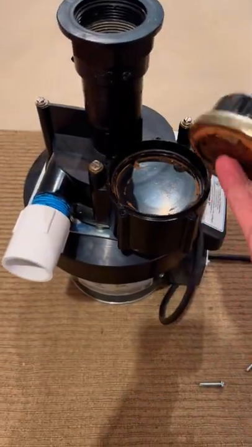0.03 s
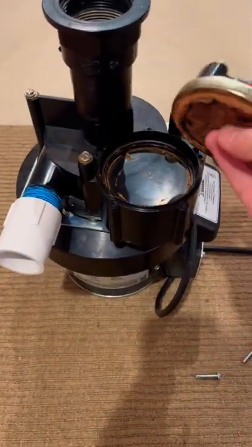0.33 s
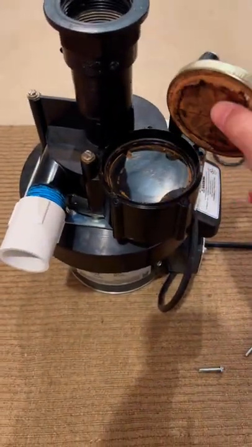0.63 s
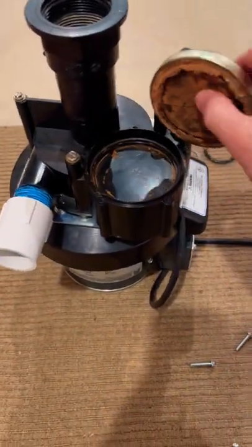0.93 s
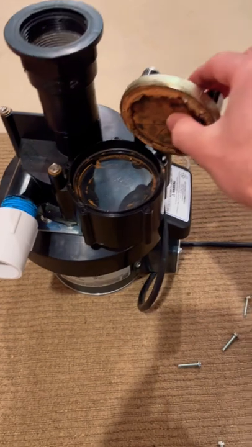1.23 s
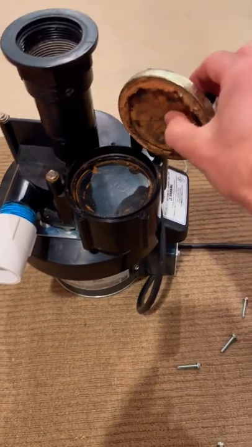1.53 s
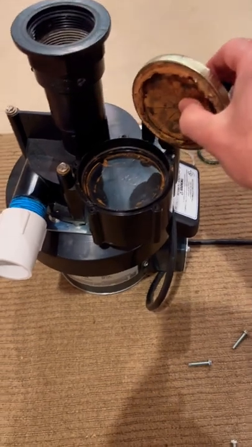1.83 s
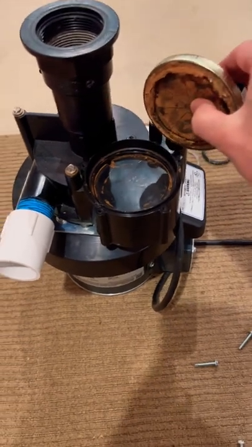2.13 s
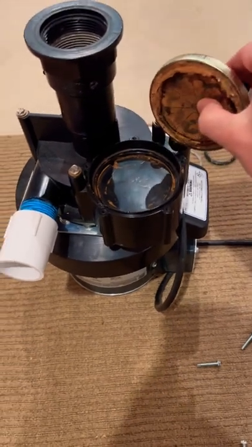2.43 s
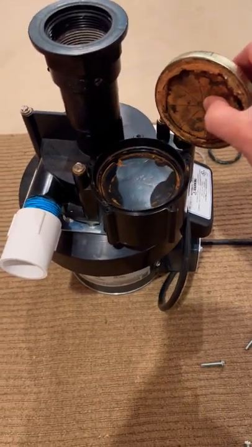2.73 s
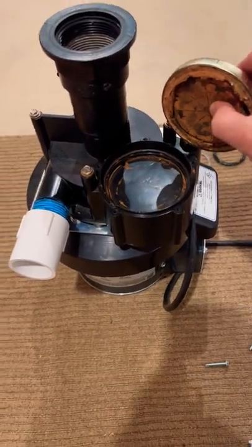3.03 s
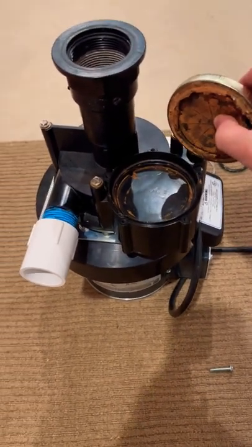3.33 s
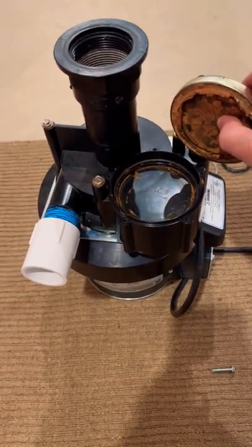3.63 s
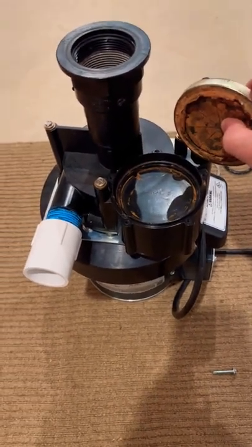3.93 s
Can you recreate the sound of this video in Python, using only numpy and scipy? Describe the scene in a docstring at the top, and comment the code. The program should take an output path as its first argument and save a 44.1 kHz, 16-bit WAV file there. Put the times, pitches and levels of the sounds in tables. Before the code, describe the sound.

In a quiet room, fingers brush softly on a metal cap. Then a switch snaps and a nearby electric pump motor buzzes briefly, settling into an even hum with a faint whine and fine rattle.

```python
"""An induction pump motor runs dry on a table in a quiet room, close to a phone, a hand on its metal cap.
After a few faint touches the switch snaps; the windings buzz with starting current and the rotor spins up.
Mains and rotor-slot tones then beat against each other over the rub of the shaft seal, which comes round
every turn with the ticks of loose parts. Room rumble and hiss lie underneath; all is heard in stereo."""
import sys
import numpy as np
from scipy import signal
from scipy.fft import rfft, irfft
from scipy.io import wavfile
from scipy.ndimage import uniform_filter1d

SR = 44100
rng = np.random.default_rng(int(sys.argv[2]) if len(sys.argv) > 2 else 0)


def master(y):
    """Save y as 16-bit WAV."""
    cut = np.clip(np.atleast_2d(y).T, -1, 1)
    pcm = np.round(cut * 32767)  # scale
    wavfile.write(sys.argv[1], SR, pcm.astype(np.int16))


N = 176400

MAINS_HZ, SHAFT_HZ = 59.973, 29.5405
ON_S, CURRENT_RISE_S, SPIN_UP_S = 1.506, .015, .188
CREST_S = 2.318  # neighbouring motor tones crest together here
FIELD_RISE_POWER, TONE_RISE_POWER = 12, 1.3  # loudness grows as these powers of speed


def motor(t):
    """Current flows at once; the rotor gathers speed and settles just under half the mains rate."""
    current = np.clip((t - ON_S) / CURRENT_RISE_S, 0, 1)
    speed = np.clip((t - ON_S) / SPIN_UP_S, 0, 1) ** .97  # share of full speed
    turns = np.cumsum(SHAFT_HZ * speed * (1 + .0001 * walk(5))) / SR
    turns -= np.interp(CREST_S, t, turns)  # shaft angle counts from the crest
    wave_phases = rng.random(64)
    tones = stator_hum(t, turns, speed, wave_phases) + rotor_tones(t, turns, speed, wave_phases)
    tones += bearing_whine(turns, speed) + starting_buzz(t, speed)
    whine = slot_flutter(t, turns, speed)
    return current * tones + whine + seal_rub(t, turns, speed, current) + rattle(turns, speed)


def motor_partial(t, turns, wave_phases, mains, shaft, db, pan_db):
    """A mains multiple plus a shaft multiple; neighbours share a magnetic wave and throb with slip."""
    hz = mains * MAINS_HZ + shaft * SHAFT_HZ
    phase = wave_phases[round(hz / (2 * MAINS_HZ))]
    return tone(mains * MAINS_HZ * (t - CREST_S) + shaft * turns + phase, hz, db, pan_db)


def stator_hum(t, turns, speed, wave_phases):
    """The stator's magnetic hum blooms as the rotor nears full speed."""
    # hum partials: mains_multiple, shaft_sideband, level_db, pan_db
    partials = [(6, 0, -62.8, -1), (10, 0, -63.2, -3), (12, -2, -67.4, -4), (12, -1, -55.8, -1),
                (12, 0, -49.1, 2), (12, 1, -65.2, 1), (14, -1, -68.3, 5), (14, 0, -61.3, -1),
                (14, 1, -69.5, -4), (16, -1, -74, -3), (16, 0, -65.5, -5), (16, 1, -67, -8),
                (18, -1, -56.2, -9), (18, 0, -47.7, -10), (18, 1, -54.9, -17), (20, 0, -64.6, -11),
                (22, 0, -66.9, -2), (22, 1, -74.0, -2), (26, 0, -70.0, -4), (36, 0, -78, 1),
                (36, 1, -78, -4)]
    hum = sum(motor_partial(t, turns, wave_phases, *row) for row in partials)
    return speed ** FIELD_RISE_POWER * hum


def rotor_tones(t, turns, speed, wave_phases):
    """Tones of the rotor, its vanes and slots glide up, swelling through the housing's resonances."""
    # rotor partials: shaft_multiple, mains_sideband, relative_db, pan_db
    partials = [(10, 0, -64.2, 2), (12, 0, -46.8, 1), (16, 0, -58.5, -5), (20, 0, -63.6, -4),
                (24, 0, -68.4, 1), (28, 0, -61.5, 0), (38, -2, -66.6, -10), (39, -2, -66.9, -8),
                (39, 0, -68.9, -15), (40, -4, -67, -6), (40, -2, -43.1, -16), (40, 2, -72.9, 1),
                (40, 4, -73.4, 0), (40, 6, -76, -4), (40, 12, -71, -3), (41, -4, -70.0, -7),
                (41, 0, -69.7, -6), (41, 2, -76.3, -6), (41, 8, -72, -2), (41, 10, -69.5, -3),
                (80, 0, -81.8, -3), (120, 0, -82, -2), (120, 4, -74, 3), (120, 6, -77.5, -5),
                (121, 4, -81.2, 6), (160, -2, -82, -15), (160, 2, -76.8, -3), (160, 4, -84.5, -9)]
    # housing resonances: frequency_hz, gain_db
    housing = [(200, -15), (320, -21), (354, -3), (390, 4.5), (470, -13), (530, -9), (600, -2), (650, 3),
               (720, 10), (810, -5), (980, -17), (1060, 2), (1200, -19), (3200, -47), (3700, -17)]
    out = 0
    for shaft, mains, db, pan_db in partials:
        gliding_hz = np.abs(mains * MAINS_HZ + shaft * SHAFT_HZ * speed)
        settled_hz = mains * MAINS_HZ + shaft * SHAFT_HZ
        swell_db = at(housing, gliding_hz) - at(housing, settled_hz)
        out += motor_partial(t, turns, wave_phases, mains, shaft, db + swell_db, pan_db)
    return undb(.5) * speed ** TONE_RISE_POWER * out


def starting_buzz(t, speed):
    """Starting current buzzes in the windings and is gone at full speed."""
    # buzz harmonics: mains_multiple, relative_db
    harmonics = [(8, -72), (9, -46.5), (10, -53), (11, -56), (12, -43.5), (13, -57), (14, -55.5),
                 (17, -54.5), (18, -43), (20, -63), (22, -63), (24, -59), (26, -80)]
    out = 0
    for multiple, db in harmonics:
        hz = multiple * MAINS_HZ
        smear_cycles = .35 * rng.random()  # softens each jolt
        out += tone(hz * (t - ON_S) + smear_cycles, hz, db, pan_db=-8.5)
    return undb(.5) * np.clip((1 - speed) / .79, 0, 1) * out


def seal_rub(t, turns, speed, current):
    """One rough track passes the seal every turn, pressed twice a mains cycle, with fresh grit on top."""
    # seal and bearings through the housing: frequency_hz, gain_db
    spectrum = [(150, -19.5), (260, -12), (330, -4), (385, 4), (460, -4.5), (600, -4.5), (850, -10),
                (1050, -17.5), (1250, -13), (1830, -12), (2030, -22), (2450, -19), (2700, -23.5),
                (3150, -21.5), (3700, -24.5), (4200, -30.5), (4950, -28.5), (5800, -35.5), (6900, -29.5),
                (7250, -33), (8000, -37.5), (10500, -36), (12500, -42.5), (16000, -41.5)]
    # stereo spread of the rub: frequency_hz, pan_db
    balance = [(200, -0.5), (400, 4.5), (550, -10.5), (750, 7.5), (1100, -1.5), (1800, -3.5), (2450, 3),
               (3150, -5.5), (4400, 2.5), (12000, -1)]
    repeating_share, grain_db, grain_samples = .25, .8, 40
    turn_samples = int(SR / SHAFT_HZ)
    place = (turns % 1 * turn_samples).astype(int)
    grains = undb(grain_db * rng.standard_normal(turn_samples // grain_samples + 1))
    track = rng.standard_normal(turn_samples)[place]
    friction = np.sqrt(repeating_share) * track + np.sqrt(1 - repeating_share) * rng.standard_normal(N)
    pulsing = 1 + .08 * np.cos(2 * np.pi * turns) + .16 * np.cos(2 * np.pi * 2 * MAINS_HZ * t)
    pressure = unit(grains[place // grain_samples] * pulsing)
    heard = stereo(friction * pressure * current, rng.standard_normal((2, N)) * current)
    panned = irfft(rfft(heard) * pan(at(balance, bins())), N)
    return undb(-49.5) * unit(colour(panned, spectrum)) * current * (.41 + .59 * speed)


def slot_flutter(t, turns, speed):
    """Slot tones a shaft rate apart crest together, so their whine flutters once a turn."""
    # slot tones, twice the mains rate above a shaft multiple: shaft_multiple, level_db, pan_db
    partials = [(120, -67, 0), (121, -65, -5), (122, -79, -1)]
    carrier = 2 * MAINS_HZ * t + rng.random()
    since_crest = turns - .75
    whine = sum(tone(carrier + shaft * since_crest, 2 * MAINS_HZ + shaft * SHAFT_HZ, db, pan_db)
                for shaft, db, pan_db in partials)
    return speed ** FIELD_RISE_POWER * whine


def bearing_whine(turns, speed):
    """Faint tones and the high whine of the bearings rise with the shaft."""
    # tones at full speed: pitch_hz, level_db
    partials = [(566.6, -66), (672.4, -68), (1094.8, -66), (2460.8, -79), (2605.4, -81), (3502.3, -80),
                (3623, -80), (4438, -84), (6794, -89), (6971, -90), (7058, -92), (7090, -92), (7235, -91),
                (7504, -91), (7682, -94), (8565, -95), (8802, -95), (9065, -95)]
    whine = sum(tone(hz / SHAFT_HZ * turns + rng.random(), hz, db) for hz, db in partials)
    return speed ** TONE_RISE_POWER * whine


def rattle(turns, speed):
    """Loose parts tick unevenly once a turn, each at its own shaft angle, and ring the housing."""
    # loose parts: centre_hz, half_width_hz, level_db, angle_turns, t60_s
    parts = [(1760, 220, -69.5, .79, 0.017), (2930, 280, -70.5, .05, .013), (7250, 1700, -83, .81, 0.022)]
    out = 0
    for hz, width, db, angle, t60 in parts:
        since = turns - angle
        strengths = undb(1.8 * np.clip(rng.standard_normal(256), -2, 2))  # one for each turn
        envelope = strengths[np.floor(since).astype(int)] * decay(since % 1 / SHAFT_HZ, 0, t60)
        ticks = envelope * speed * rng.standard_normal(N)
        resonance = 1 / (1 + 1j * (bins() - hz) / width) ** 2
        out += undb(db) * unit(irfft(rfft(ticks) * channel_phase(bins()) * resonance, N))
    return out * pan(-3.5)


def switch(t):
    """The contact snaps and bounces, its spring rings and the room answers briefly."""
    # contact strikes: start_s, relative_db
    contacts = [(1.5066, -2.5), (1.5074, -5), (1.5082, -12)]
    # colour of the snap: frequency_hz, gain_db
    snap_spectrum = [(120, -40), (200, -23), (730, 3.5), (950, -11), (1280, -4.5), (1800, -9), (2800, -4.5),
                     (3480, -15.5), (4900, -10), (5800, -12), (6900, -7.5), (7600, -15.5), (8600, -11.5),
                     (9400, -15), (10600, -4), (12000, -17), (13500, -24), (15500, -19)]
    # hard tick of the first contact: frequency_hz, gain_db
    tick_spectrum = [(2000, -15), (5000, 0), (7600, -7), (9000, 1), (11500, -1), (13500, -7), (15500, -5)]
    # ring of the spring: pitch_hz, level_db, t60_s
    modes = [(1290, -30.5, 0.013), (4900, -57, .055), (4963, -37, 0.098), (5130, -47, 0.052),
             (7150, -65, .1), (7989, -62, .08), (11630, -64, .08)]
    start = contacts[0][0]
    bounces = sum(undb(db) * decay(t, s, t60=.013) for s, db in contacts)
    crack = stereo_noise(snap_spectrum) * bounces
    tail = undb(-13) * stereo_noise(snap_spectrum) * decay(t, start, t60=.13)
    ring = 0
    for hz, db, t60 in modes:
        swing = (channel_phase(hz) * np.exp(2j * np.pi * hz * (t - start))).imag
        ring += undb(db) * decay(t, start, t60) * swing
    strike = signal.unit_impulse(N, int(start * SR))
    tick = colour(stereo(strike, np.zeros((2, N))), tick_spectrum)
    return undb(-22.5) * (crack + tail) + ring + undb(-12.5) * tick


def hand_on_cap(t):
    """Fingers scuff and slide on the cap, and it gives one soft knock."""
    # finger scuffs: start_s, level_db, centre_hz, half_width_share (of the centre), t60_s
    touches = [(.022, -59, 1660, .2, 0.17), (.03, -65.5, 2400, 0.28, 0.2), (.261, -66, 1660, 0.23, .08),
               (.342, -64, 1610, 0.23, .12), (0.377, -63, 2300, .3, 0.11), (.389, -59, 1200, 0.2, 0.049),
               (.406, -65, 3830, 0.38, 0.48), (.415, -69, 8000, 0.22, 0.011), (.643, -65.5, 1410, 0.22, .2),
               (.67, -69, 4200, 0.44, 0.27), (.895, -67, 2850, 0.44, .14), (1.04, -72, 4140, 0.43, 0.43),
               (1.13, -70, 4200, 0.5, 0.22), (1.255, -73, 4200, .4, .25), (1.324, -65.5, 1620, .3, 0.11)]
    knock_s, knock_hz, attack_s = .3905, 500, .005
    out = undb(-38) * decay(t, knock_s, t60=.018) * np.sin(2 * np.pi * knock_hz * (t - knock_s))
    for start, db, hz, width, t60 in touches:
        band = 1 / (1 + ((bins() / hz - 1) / width) ** 2) ** 2
        scuff = unit(irfft(rfft(rng.standard_normal((2, N))) * band, N))
        peak_s = start + attack_s
        envelope = np.clip((t - start) / attack_s, 0, 1) * decay(np.maximum(t, peak_s), peak_s, t60)
        out = out + undb(db) * envelope * scuff
    return out


def room(t):
    """Low rumble and hum of the building, with a faint hiss."""
    # colour of the rumble: frequency_hz, gain_db
    rumble_spectrum = [(22, -12.5), (31, -41), (40, -14.5), (55, -5), (72, -10.5), (88, -10), (120, -6.5),
                       (160, -1.5), (196, -12.5), (260, -13), (394, -17.5), (600, -21), (850, -28),
                       (1200, -32), (1670, -32), (2200, -40), (3830, -36.5), (5000, -43), (6100, -67),
                       (15000, -76.5)]
    # stereo width of the rumble: frequency_hz, side_minus_mid_db
    width = [(25, -28), (60, -24), (110, -19), (200, -13), (380, -6), (1200, -1), (12000, 0)]
    # colour of the hiss: frequency_hz, gain_db
    hiss_spectrum = [(1500, -32), (2700, -12.5), (3800, -2), (5000, -1.5), (6000, -1.5), (8000, -8.5),
                     (12000, -10), (15000, -15.5)]
    # steady hum: pitch_hz, level_db
    hum_tones = [(59.3, -61), (67.9, -62), (98.5, -67.5), (119.9, -63.5), (147.5, -64), (246, -64.5)]
    mid, side = colour(rng.standard_normal((2, N)), rumble_spectrum)
    rumble = unit(mid + np.array([[1], [-1]]) * colour(side, width)) * undb(-55.5 + 1.57 * walk(5.8))
    hiss = stereo_noise(hiss_spectrum) * undb(-71.5 + 1.05 * walk(13))
    return rumble + hiss + sum(tone(hz * t + rng.random(), hz, db) for hz, db in hum_tones)


def channel_phase(hz):
    """The phone's left and right channels are out of step, by a phase that varies with frequency."""
    # phase between the channels: frequency_hz, left_lead_rad
    phase_curve = [(0, 0), (150, 0), (360, -.65), (720, -.9), (900, -1.1), (1080, -.2), (1800, .1),
                   (2400, 1.8), (3700, 1.3), (4200, 1.2), (4800, .4), (5500, 2.6), (6200, 3.3), (7600, 6),
                   (8300, 6.4), (9000, 7.3), (9650, 9.2), (11000, 9.8), (11700, 11.9), (13100, 12.8),
                   (13800, 15.4), (15500, 15.7)]
    left_lead = np.interp(hz, *np.transpose(phase_curve))
    return np.exp(.5j * np.array([[1], [-1]]) * left_lead)


def stereo(direct, scattered):
    """Direct sound takes the phone's channel phase; scattered sound differs per side and is duller."""
    # colour of the scattered sound: frequency_hz, gain_db
    diffuse = [(200, -6.5), (2000, -5), (4500, -5.5), (6500, -24.5), (15000, -19)]
    return irfft(rfft(direct) * channel_phase(bins()), N) + colour(scattered, diffuse)


def stereo_noise(spectrum):
    """Coloured noise of rms 1, partly shared by the two channels."""
    return unit(colour(stereo(rng.standard_normal(N), rng.standard_normal((2, N))), spectrum))


def tone(cycles, hz, db, pan_db=0.):
    """One slightly wavering partial; cycles drives its pitch, hz sets its phase between the channels."""
    swing = (channel_phase(hz) * pan(pan_db) * np.exp(2j * np.pi * cycles)).real
    return np.sqrt(2) * undb(db + .4 * walk(6.03)) * swing


def pan(db):
    """Left and right gains of constant total power; db is left minus right."""
    gains = undb(np.array([db, -db]).reshape(2, -1) / 2)
    return gains / np.sqrt(np.mean(gains ** 2, axis=0))


def walk(rate_hz):
    """Smooth random drift of rms 1."""
    step = int(SR / rate_hz)
    stairs = np.repeat(rng.standard_normal(N // step + 2), step)
    return unit(uniform_filter1d(stairs, step)[:N])


def decay(t, start, t60):
    """Sudden start, then a fall of 60 dB every t60 seconds."""
    return (t >= start) * np.exp(-np.log(1000) * np.maximum(t - start, 0) / t60)


def colour(x, points):
    """Filter by (Hz, dB) points."""
    return irfft(rfft(x) * undb(at(points, bins())), N)


def at(points, hz):
    """Read (Hz, value) points on a log-frequency axis."""
    point_hz, values = np.transpose(points)
    return np.interp(np.log(hz + 1), np.log(point_hz + 1), values)


def bins():
    """Frequencies of the spectrum in Hz."""
    return np.arange(N // 2 + 1) * SR / N


def undb(db):
    """Decibels to gain."""
    return 10 ** (np.asarray(db) / 20)


def unit(x):
    """Scale to rms 1."""
    return x / np.sqrt(np.mean(x ** 2))


def scene():
    """Motor, switch, hand and room at the phone."""
    t = np.arange(N) / SR
    return motor(t) + switch(t) + hand_on_cap(t) + room(t)


def record(dry):
    """The phone cuts the treble steeply above 15.7 kHz."""
    return signal.sosfilt(signal.ellip(8, .2, 70, 15700, fs=SR, output="sos"), dry)


dry = scene()
out = record(dry)
master(out)
```